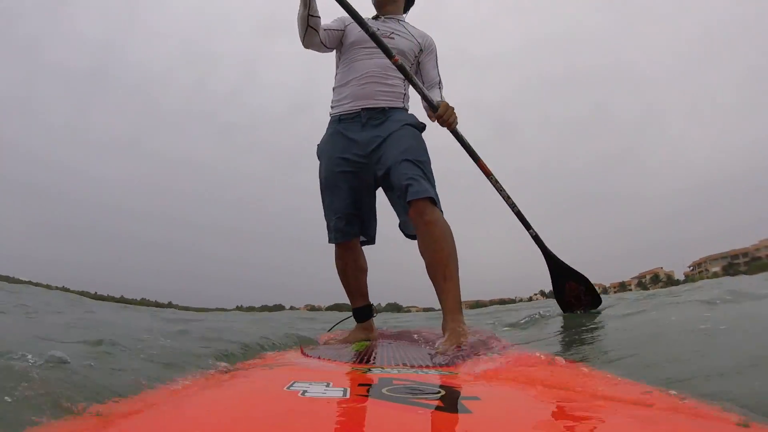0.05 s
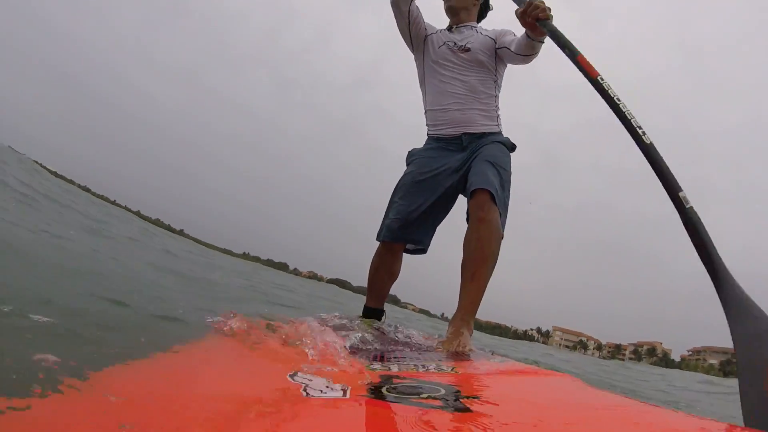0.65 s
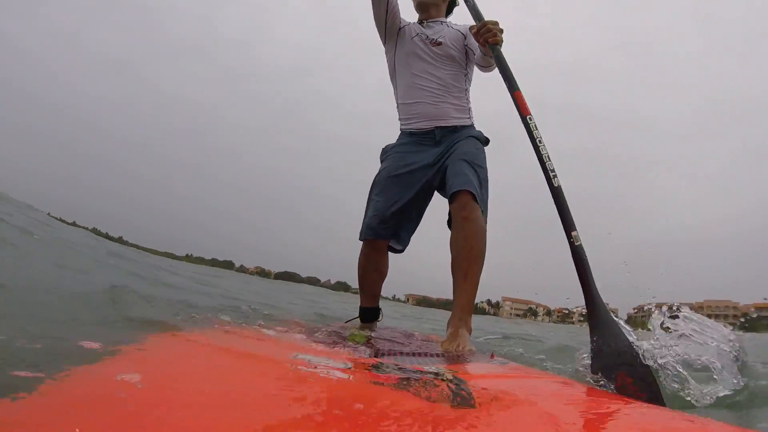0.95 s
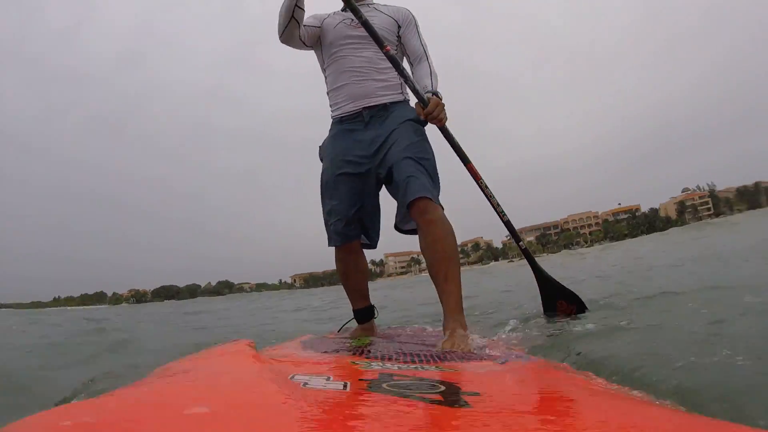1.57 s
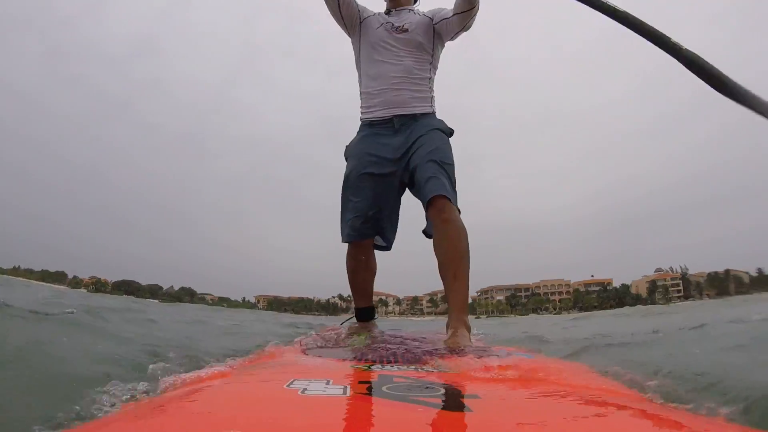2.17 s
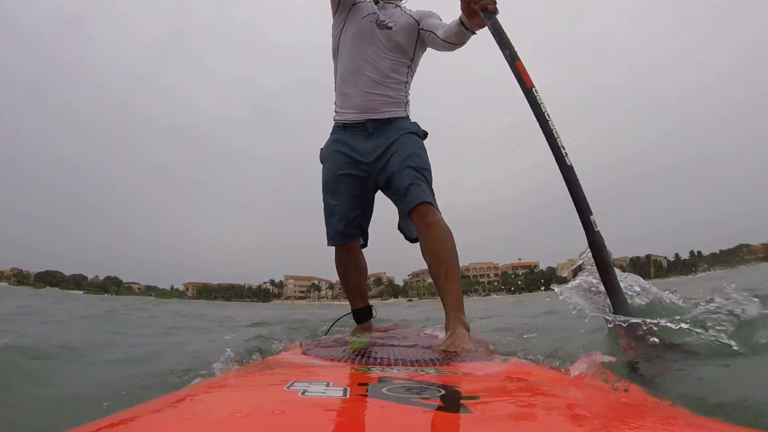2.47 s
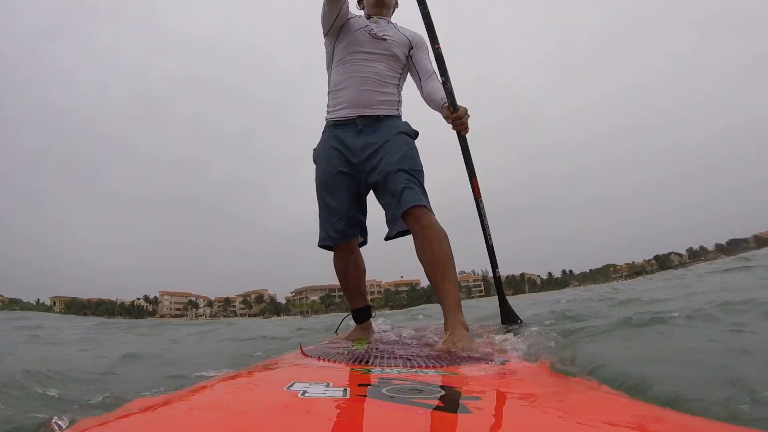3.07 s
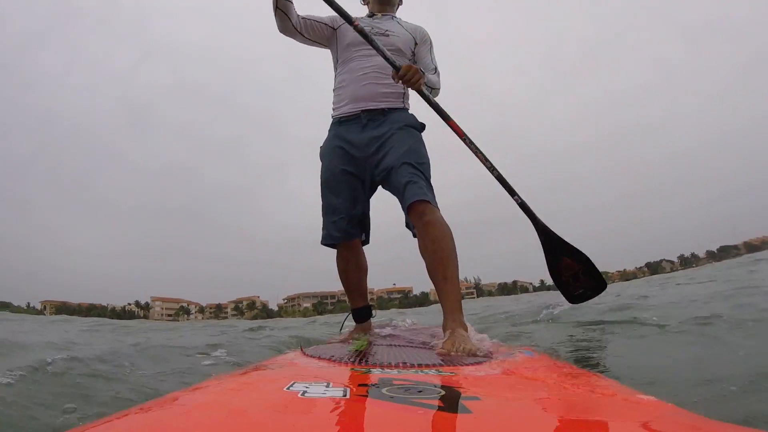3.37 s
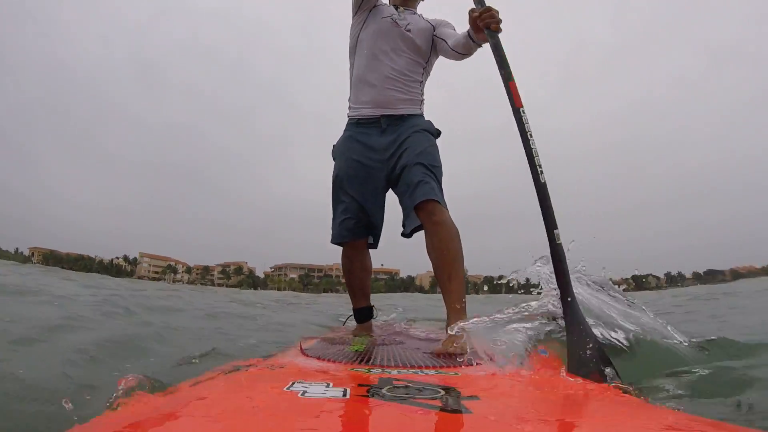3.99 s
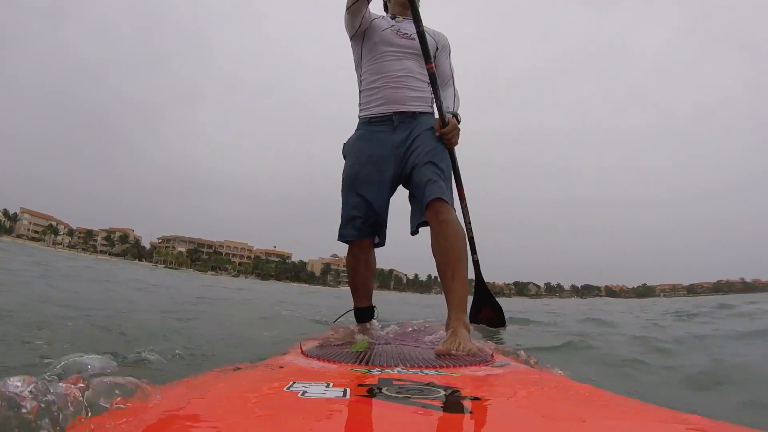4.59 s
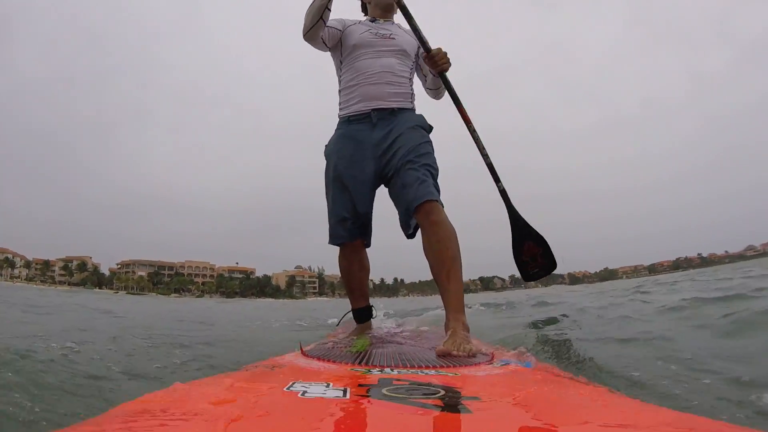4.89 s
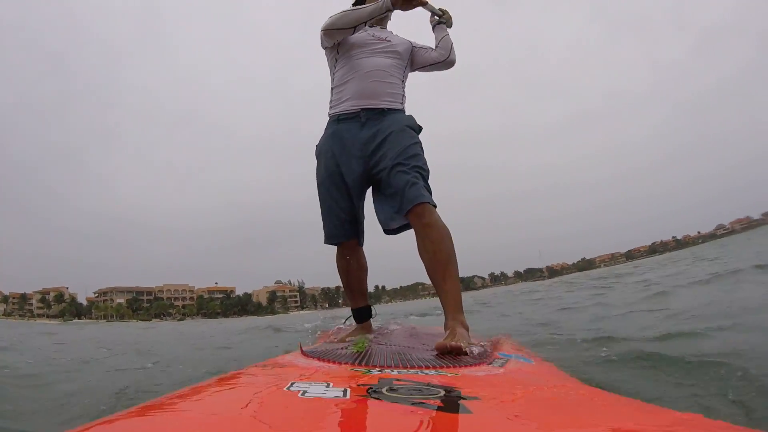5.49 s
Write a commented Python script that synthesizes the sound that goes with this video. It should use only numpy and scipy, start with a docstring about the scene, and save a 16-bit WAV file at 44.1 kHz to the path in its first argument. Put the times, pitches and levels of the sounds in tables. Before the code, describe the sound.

Choppy water gurgles and slaps against a hollow paddleboard while paddle strokes splash and wind rumbles on the microphone.

```python
"""A paddleboard crosses choppy sea, heard from a camera in a housing on its nose.
At first a film of water muffles the microphone; it drains off within a second. All along, waves gurgle
by the board's edges and throw spray on the housing, and wavelets slap the hollow hull, trapping air.
From about one second on, the paddle flings up four showers that rain back on the sea.
Near the end, the wind that has been rumbling on the microphone rises into thumping gusts."""
import sys
import numpy as np
from scipy import signal
from scipy.fft import rfft, irfft
from scipy.io import wavfile
from scipy.ndimage import map_coordinates

SR = 44100
rng = np.random.default_rng(int(sys.argv[2]) if len(sys.argv) > 2 else 0)


def generate_wav(sig):
    """Save sig (samples, or channels by samples) to the path in sys.argv[1] as 16-bit PCM at SR."""
    pcm = np.round(np.clip(np.atleast_2d(sig).T, -1, 1) * 32767).astype(np.int16)
    wavfile.write(sys.argv[1], SR, pcm)


N = 248724
TIME = np.arange(N) / SR

# A tone table says how strong a sound is from low to high. Columns: pitch_hz, level_db
WIND_TONE = [(15, -1), (30, -5), (58, -1.5), (95, -6.5), (170, -12.5), (320, -20.5), (520, -26), (900, -40)]  # wind on the microphone
DRUM_TONE = [(60, -21), (88, 5), (115, -4.5), (170, -7.5)]  # waves drumming on the board
GURGLE_TONE = [(160, -4), (210, -4), (280, 3), (420, -7.5), (560, -3.5), (700, -10)]  # large bubbles
BABBLE_TONE = [(700, 4.5), (1100, 4), (1500, -0.5), (2200, -3), (3200, -30.5)]  # small bubbles
FOAM_TONE = [(1900, 10.5), (3300, -2.5), (5200, -7.5)]  # tiny bubbles in foam
FIZZ_TONE = [(2500, 7.5), (5000, -0.5), (9400, -2.5)]  # bursting bubbles and fine droplets
GUSH_TONE = [(350, 0), (600, 5), (820, -4.5), (1100, -5), (1600, -8.5), (2400, -11.5), (3200, -27.5)]  # breaking crests
SPLASH_TONE = [(350, -5), (600, 5), (820, -4.5), (1100, -6.5), (1600, -8.5), (2400, -23.5), (4000, -29.5)]  # bubbles scattered by a slap
CHURN_TONE = [(270, 0), (450, 2), (700, -10), (1200, -18.5)]  # bubbles torn from an air pocket

# Breeze on the microphone: time_s, level_db
BREEZE = [(0, -29), (.6, -33), (1.35, -30.5), (1.47, -39), (2.47, -44), (2.95, -33), (3.2, -37.5),
          (4.68, -34.5), (4.75, -27), (5.0, -26), (5.25, -24.5), (5.64, -29.5)]
# Gusts on top of the breeze: middle_s, level_db, half_length_s
GUSTS = [(.39, -33, 0.0333), (4.24, -33.5, 0.05864), (5.075, -20, 0.04601), (5.28, -19.5, 0.05883),
         (5.47, -18.5, 0.05638), (5.64, -14, 0.0283)]
# Single swirls of air hitting the microphone: middle_s, level_db, pitch_hz
WIND_THUMPS = [(5.071, -9.5, 58.71), (5.245, -21, 61.68), (5.317, -10, 45), (5.386, -15, 55.6),
               (5.469, -13, 85.87), (5.628, -15, 73.8)]
# Water from the paddle coming down: full_at_s, rise_s, hold_s, level_db
STROKES = [(1.16, 0.1536, 0.0536, -38), (2.625, 0.0011, 0.1844, -43), (4.162, 0.0241, 0.04187, -37),
           (4.733, 0.2361, 0.127, -40.5)]
# Ripples between the waves: drum_db, gurgle_db, babble_db, spray_db
RIPPLES = (-48.5, -48, -54, -57)
# Waves running along the hull: full_at_s, hold_s, drum_db, gurgle_db, babble_db, spray_db
WAVES = [(0, 0.04776, -46, -35.5, -36.5, -71.5), (0.329, 0.0758, -51, -46.5, -44, -65),
         (0.566, 0.0455, -46.5, -31, -36, -54.5), (0.65, 0.10923, -34, -32, -39.5, -52.5),
         (0.849, 0.2696, -36.5, -54, -48, -53.5), (1.293, 0.09622, -33, -42.5, -44.5, -49.5),
         (1.464, 0.0592, -54.5, -38, -39, -46), (1.657, 0.15285, -39, -34.5, -37.5, -44.5),
         (1.946, 0.07841, -42.5, -33, -41, -43), (2.133, 0.0904, -55, -72, -46.5, -52.5),
         (2.428, 0.02643, -43.5, -34, -41, -51), (2.602, 0.17317, -55, -38, -44, -45.5),
         (2.809, 0.09508, -37.5, -39, -42, -48), (2.983, 0.06013, -34, -36, -45, -47.5),
         (3.168, 0.02344, -45, -38.5, -49, -75), (3.79, 0.03108, -37, -49, -52.5, -56.5),
         (4.037, 0.02653, -33, -30, -38.5, -47.5), (4.196, 0.10323, -33, -44, -41.5, -44),
         (4.42, 0.1748, -37.5, -31.5, -40.5, -44.5), (4.752, 0.24305, -34.5, -37, -42.5, -57),
         (5.038, 0.3065, -39, -36, -45.5, -49.5), (5.478, .22, -34, -37, -52, -53.5)]
# The ways the camera housing rings: pitch_hz, width_hz, level_db
HOUSING_RINGS = [(2987.4, 3912.5, -14), (5037.7, 650, -8), (6491.4, 267.43, 1), (7208.1, 754.9, -4.5),
                 (8411.3, 686.1, -3.5)]
# The heaviest drops landing on the housing: start_s, level_db
HEAVY_DROPS = [(.1445, -18.5), (.632, -26), (.6794, -27), (.7101, -32.5), (.7585, -29.5), (1.638, -21),
               (1.7153, -24), (1.7855, -19.5), (1.9478, -25.5), (1.9949, -21), (2.2148, -23.5),
               (2.4473, -25.5), (2.6115, -25), (2.7316, -19), (2.7738, -24), (2.8395, -23), (3.0677, -22.5),
               (3.1411, -32.5), (3.2, -34), (3.6282, -34.5), (3.755, -31.5), (3.802, -32.5), (4.049, -26),
               (4.1438, -23.5), (4.1645, -14.5), (4.43, -22), (4.457, -22.5), (4.6242, -37), (4.7267, -19),
               (4.8407, -18.5), (5.198, -26.5), (5.3395, -24.5), (5.5089, -28)]
# Short rushes of breaking water: middle_s, level_db, half_length_s
GUSHES = [(.142, -21, 0.00385), (.342, -34, 0.003883), (.385, -29.5, 0.01169), (.585, -32.5, 0.02865),
          (1.904, -30.5, 0.002028), (1.971, -34, 0.024), (2.011, -31.5, 0.010734), (2.448, -35.5, 0.01359),
          (2.978, -27, 0.006609), (3.079, -26.5, 0.008912), (3.126, -34, 0.007455),
          (3.187, -28.5, 0.007865), (3.222, -34, 0.00859), (3.766, -36, 0.004125), (3.93, -35, 0.012516),
          (4.038, -27.5, 0.003794), (4.092, -36.5, 0.00587), (4.414, -29, 0.005987), (4.485, -30, 0.00661),
          (4.53, -30, 0.00326), (4.554, -29, 0.01077), (4.587, -26.5, 0.01763), (4.637, -32.5, 0.0086),
          (4.73, -33, 0.002732), (4.849, -26.5, 0.006427), (5.06, -33, 0.01605), (5.312, -38.5, 0.00405),
          (5.341, -31.5, 0.005114), (5.436, -40.5, 0.004527), (5.512, -33, 0.001888)]
# The clearest single bubbles: start_s, level_db, pitch_hz
PLOPS = [(.009, -18, 997.7), (.042, -34, 1060), (0.229, -20.5, 257.2), (0.452, -20.5, 136.5),
         (.546, -23, 970.6), (.577, -17, 434.3), (.603, -17, 382.6), (.609, -26.5, 1009),
         (0.696, -20.5, 120.4), (.724, -20.5, 219.1), (.752, -19, 258.5), (1.181, -28, 3736),
         (1.317, -21.5, 1030), (1.319, -18.5, 1331), (1.322, -25, 1530), (1.674, -24, 1617),
         (1.678, -11.5, 529.8), (1.712, -28, 1700), (1.953, -18, 2129), (2.031, -20, 350),
         (2.546, -11.5, 592.3), (2.547, -18.5, 1224), (2.559, -23.5, 484.8), (2.594, -24, 337.4),
         (2.648, -24, 305.3), (2.664, -23, 301.5), (3.082, -18.5, 423), (3.183, -21, 940.8),
         (3.217, -19.5, 440.3), (3.207, -14, 1058), (3.344, -35, 2471), (3.499, -27.5, 537.7),
         (3.546, -25.5, 328.2), (3.762, -32, 1846), (3.864, -34.5, 1411), (3.918, -27, 980.2),
         (4.034, -26, 1949), (4.068, -27, 2245), (4.092, -29.5, 1262), (4.146, -29.5, 1228),
         (4.165, -25.5, 2133), (4.168, -29, 3220), (4.482, -16, 433.9), (4.577, -17.5, 678.2),
         (4.734, -23, 588.3), (4.823, -21.5, 596.1), (4.879, -16, 229.3), (5.305, -27, 1875),
         (5.337, -21.5, 473.5)]
# The ways the hollow board rings: pitch_hz, level_db, fade_s (time to fall 60 dB)
HULL_RINGS = [(91.46, 2.5, 0.23847), (160.86, 0.5, 0.058), (287.56, -7.5, 0.14), (562.54, -3.5, 0.06)]
# Wavelets slapping the hull: start_s, pocket_db, pocket_hz, swell_cycles, smack_hz, splash_db, board_db
SLAPS = [(0.1437, -9.5, 220, 0.2434, 1012, -25.5, -28), (0.5698, -8, 352.3, 1.0074, 952.3, -39, -53.5),
         (.640, -11, 194.5, 0.3283, 900, -47.5, -23.5), (.647, -8, 212.7, 0.5896, 700, -53.5, -48),
         (.852, -19.5, 225.3, 0.24, 1140, -34.5, -43), (.873, -12, 203.1, 0.7286, 930.8, -28, -43.5),
         (0.892, -16, 199.3, 0.4313, 1100, -46.5, -37), (1.901, -15, 430.6, 0.6743, 680, -43.5, -31.5),
         (1.9504, -8, 221.8, 0.3585, 547.9, -26, -20.5), (1.9934, -6.5, 198.4, 0.4858, 650, -24.5, -28.5),
         (2.544, -6.5, 267.7, 0.4154, 816.8, -25.5, -29), (2.966, -6, 236.3, 0.522, 609.2, -38, -16.5),
         (2.9789, -6, 424.2, 1.1263, 758.6, -24.5, -25.5), (3.034, -19.5, 259, 0.9174, 684, -57, -42),
         (3.068, -15, 237.8, 0.6734, 698.8, -34.5, -29.5), (3.138, -5, 181.9, 0.3887, 606.2, -39, -27.5),
         (3.205, -5.5, 231.2, 0.2903, 552.7, -25.5, -31.5), (3.772, -14, 196.2, 0.5836, 608.8, -38, -25),
         (3.984, -13, 242.5, 0.2687, 546.8, -30.5, -17), (4.052, -23, 327.4, 0.4, 613, -34, -24.5),
         (4.094, -27.5, 300, .4, 640, -46.5, -33), (4.376, -33, 139.8, 1.886, 604, -61.5, -22.5),
         (4.823, -17.5, 255.5, 0.6505, 600, -40.5, -28), (4.844, -16.5, 225.5, 0.867, 1109, -32, -26.5),
         (4.956, -14, 264.4, 0.36, 573.6, -32.5, -23), (4.885, -19.5, 221.1, 0.481, 555.3, -44.5, -31.5),
         (5.256, -17.5, 256.1, 0.508, 600.9, -45.5, -28), (5.458, -16, 237.5, 0.562, 603, -45, -32),
         (5.511, -13, 332.6, 0.2603, 605.2, -49.5, -24)]
# Water film over the microphone: time_s, treble_loss_db, hollowness (0 to 1)
FILM = [(0, 32, 0.82), (.33, 31, 0.96), (.40, 16.5, 0.99), (.51, 16.5, 0.82), (.54, 5, 0.66),
        (.75, 2.5, 0.92), (1.0, 2, 0)]
# The hollow sound of the wet housing: pitch_hz, width_hz, boost_db
FILM_BANDS = [(236.6, 130, 3), (638.13, 562.6, -17), (966.32, 161.6, 9.5), (1227.5, 280, -6.5),
              (2104.4, 820, 5)]

WAVE_RISE_S, WAVE_FALL_DB_PER_S = 0.1562, 131.5  # a rise is the time taken to gain 20 dB
SPRAY_FLIGHT_S, SPRAY_RISE_S, SPRAY_FALL_DB_PER_S = 0.0068, 0.14, 66.5
STROKE_FALL_DB_PER_S, TINKLE_DB, STROKE_BABBLE_DB = 77.5, -3.5, -4.5
POCKET_CYCLES, DAMPED_ABOVE_DB, DB_PER_HALVING = 3.4985, -10.5, 20
CHURN_DB, CHURN_DECAY_S = -20.5, 0.014273
SLAP_CUT_HZ, SPLASH_CUT_HZ, FILM_CUT_HZ = 3076.6, 2513.7, 2874.3
HISS_DB, ROLL_OFF_HZ, CUTOFF_HZ = -71.5, 10250, 13900


def from_db(db):
    """Turn decibels into a number to multiply by."""
    return 10 ** (np.asarray(db) / 20)


def rms_one(x):
    """Scale a sound to an average power of 1."""
    return x / np.sqrt(np.mean(x ** 2) + 1e-20)


def in_time(rows):
    """Join a table's points with lines: one curve for each column after the time."""
    times, *columns = np.transpose(rows)
    return [np.interp(TIME, times, column) for column in columns]


def butter(x, hz, kind, order=2):
    """Keep the "low" or the "high" side of hz."""
    return signal.sosfilt(signal.butter(order, hz, kind, fs=SR, output="sos"), x + 1e-18)


def resonate(x, hz, width_hz):
    """Let a sound ring at one pitch, weakening the others."""
    r = np.exp(-np.pi * width_hz / SR)
    feedback = [1, -2 * r * np.cos(2 * np.pi * hz / SR), r * r]
    return signal.lfilter(np.array([1, 0, -1]) * (1 - r * r) / 2, feedback, x + 1e-18)


def drift(per_s):
    """A random wobble that takes a new value per_s times a second."""
    return map_coordinates(rng.standard_normal(4096), [TIME * per_s], order=1, mode="wrap")


def add(track, start_s, sound):
    """Mix a sound into a track."""
    at = max(round(start_s * SR), 0)
    track[at:at + len(sound)] += sound[:N - at]


def swells(rows):
    """Level over time of short rushes that rise and fall smoothly."""
    return sum(from_db(db) * np.exp(-((TIME - s) / half_s) ** 2 / 2) for s, db, half_s in rows)


def surges(rows, rise_s, fall_db_per_s):
    """Power over time of water that rises, holds and drains away."""
    power = np.zeros(N)
    for full_at_s, hold_s, db in rows:
        rising_db = 20 * np.maximum(full_at_s - TIME, 0) / rise_s
        draining_db = fall_db_per_s * np.maximum(TIME - full_at_s - hold_s, 0)
        power += from_db(db - rising_db - draining_db) ** 2
    return power


def strays(per_s, db, spread_db):
    """Chance events as rows: start_s, level_db, size (0 to 1)."""
    late, strength, size = rng.random((64, 3)).T
    start_s = (np.arange(len(late)) + late) / per_s
    return np.transpose([start_s, db + spread_db * (2 * strength - 1), size])[start_s < TIME[-1]]


def clicks(per_s, spread_db):
    """Random clicks, many small and a few large."""
    chance = rng.random(N) * SR / per_s
    born = np.flatnonzero(chance < 1)
    out = np.zeros(N)
    out[born] = from_db(spread_db * np.minimum(-np.log(chance[born]), np.pi)) * (-1) ** born
    return out


def bubbling(tone, per_s, spread_db, sharpness, pitches):
    """A swarm of bubbles: each is a click that rings for a few cycles."""
    hz, db = np.transpose(tone)
    out = np.zeros(N)
    for pitch in np.geomspace(hz[0], hz[-1], pitches):
        width = pitch / max(sharpness, 1)
        births = clicks(per_s / pitches, spread_db)
        rings = resonate(resonate(births, pitch, width), pitch, width)
        out += rms_one(rings) * np.sqrt(pitch) * from_db(np.interp(np.log(pitch), np.log(hz), db))
    return rms_one(out)


def bubble(hz, cycles, rise, swell):
    """One pocket of air swells, fades and climbs in pitch as it nears the surface."""
    turns = TIME[:SR // 5] * hz
    life = turns / max(cycles, 1)
    ring = np.sin(2 * np.pi * turns * (1 + rise * life / 2))
    wave = ring * (1 - np.exp(-(turns / swell) ** 2)) * np.exp(-np.log(1000) * life)
    return wave / np.abs(wave).max()


def wind():
    """Swirling air rumbles unevenly on the microphone: a breeze with gusts on top."""
    hz, db = np.transpose(WIND_TONE)
    all_hz = np.maximum(np.arange(N // 2 + 1) * SR / N, 1)
    shape = from_db(np.interp(np.log(all_hz), np.log(hz), db)) / (1 + (all_hz / hz[-1]) ** 2)
    noise = irfft(rfft(rng.standard_normal(N)) * shape, N)
    rumble = rms_one(butter(noise, 18, "high"))
    breeze_db, = in_time(BREEZE)
    return rumble * np.hypot(from_db(breeze_db), swells(GUSTS)) * from_db(0.37 * drift(25) - 0.5)


def wind_thumps(half_length_cycles=0.5388):
    """A swirl of air hits the microphone with one low thump."""
    out = np.zeros(N)
    for middle_s, db, hz in WIND_THUMPS:
        turns = hz * (TIME - middle_s)
        out += from_db(db) * np.cos(2 * np.pi * turns) * np.exp(-(turns / half_length_cycles) ** 2)
    return out


def paddle():
    """Power over time of the water that the strokes fling up."""
    return sum(surges([(s, hold_s, db)], rise_s, STROKE_FALL_DB_PER_S)
               for s, rise_s, hold_s, db in STROKES)


def showers():
    """Water thrown up by the paddle rains back and tinkles on the sea."""
    tinkle = bubbling(FOAM_TONE, per_s=6500, spread_db=4.5, sharpness=3.2, pitches=18)
    return np.sqrt(paddle()) * from_db(TINKLE_DB) * tinkle


def housing(x):
    """The camera's case rings at several high pitches when water hits it."""
    return sum(from_db(db) * resonate(x, hz, width) * (-1) ** k
               for k, (hz, width, db) in enumerate(HOUSING_RINGS))


def spray():
    """Foam and fine droplets from waves and paddle fizz on and around the housing."""
    thrown = [(s + SPRAY_FLIGHT_S, hold_s, db) for s, hold_s, *_, db in WAVES]
    power = from_db(RIPPLES[-1]) ** 2 + surges(thrown, SPRAY_RISE_S, SPRAY_FALL_DB_PER_S) + paddle()
    fizz = bubbling(FIZZ_TONE, per_s=1600, spread_db=6.5, sharpness=7.516, pitches=22)
    mist = 1.1607 * rng.standard_normal(N)  # the finest droplets merge into a hiss
    foam = from_db(-5) * bubbling(FOAM_TONE, per_s=1100, spread_db=3, sharpness=6.9, pitches=14)
    flicker = from_db(0.2086 + 0.8 * drift(70))
    return (rms_one(housing(fizz + mist)) + foam) * np.sqrt(power) * flicker


def drops():
    """Drops tick and spatter on the housing; the light ones come by chance."""
    taps = np.zeros(N)
    t = TIME[:SR // 30]
    light = [(s, db) for s, db, _ in strays(per_s=9.4, db=-35.5, spread_db=5.5)]
    for start_s, db in list(HEAVY_DROPS) + light:
        spatter = 0.11848 * rng.standard_normal(len(t)) * np.exp(-t / 0.007416)
        add(taps, start_s, from_db(db + 18.5) * (signal.unit_impulse(len(t)) + spatter))
    return housing(taps)


def wave_levels():
    """How strongly ripples and waves drum, gurgle and babble over time; the paddle adds babble."""
    full_at_s, hold_s, *levels = np.transpose(WAVES)
    drum, gurgle, babble = (
        from_db(calm_db) ** 2 + surges(zip(full_at_s, hold_s, db), WAVE_RISE_S, WAVE_FALL_DB_PER_S)
        for db, calm_db in zip(levels[:-1], RIPPLES))
    return np.sqrt([drum, gurgle, babble + from_db(STROKE_BABBLE_DB) ** 2 * paddle()])


def waves(drum_level, gurgle_level, babble_level):
    """Waves drum on the hollow board and fold in air: big bubbles gurgle, small ones babble."""
    wobble = drift(35)
    drum = bubbling(DRUM_TONE, per_s=300, spread_db=3.5, sharpness=2.9855, pitches=6)
    gurgle = bubbling(GURGLE_TONE, per_s=1000, spread_db=2, sharpness=4.446, pitches=10)
    babble = bubbling(BABBLE_TONE, per_s=1800, spread_db=3, sharpness=7.556, pitches=22)
    return (drum * drum_level * from_db(3)
            + gurgle * gurgle_level * from_db(1 + 1.919 * wobble)
            + babble * babble_level * from_db(-1.7435 + 1.3 * wobble))


def gushes():
    """Small crests break over the board's edges in a rush of bubbles."""
    return swells(GUSHES) * bubbling(GUSH_TONE, per_s=3200, spread_db=0.5, sharpness=2.74, pitches=14)


def plops(babble_level, low_hz=1193.3, high_hz=2804.6):
    """Lone bubbles ring with a clear pitch; faint stray ones grow with the babble around them."""
    clear, faint = np.zeros((2, N))
    stray = [(s, db, high_hz * (low_hz / high_hz) ** size)
             for s, db, size in strays(per_s=8, db=9, spread_db=-1)]
    for track, rows in ((clear, PLOPS), (faint, stray)):
        for start_s, db, hz in rows:
            plop = bubble(hz, cycles=6 + hz * 0.016613, rise=0.024, swell=0.4493)
            add(track, start_s, from_db(db) * plop)
    return clear + babble_level * faint


def slaps():
    """A wavelet smacks the hull and traps air, which throbs and breaks up while the board rings."""
    pockets, board, scatter, churn = np.zeros((4, N))
    t = TIME[:SR // 4]
    knock = sum(from_db(db) * np.sin(2 * np.pi * hz * t) * np.exp(-np.log(1000) * t / fade_s)
                for hz, db, fade_s in HULL_RINGS)
    burst = (1 - np.exp(-t / 0.00052)) * (np.exp(-t / 0.005451) + 0.16 * np.exp(-t / 0.019))
    for start_s, pocket_db, hz, swell, smack_hz, splash_db, board_db in SLAPS:
        smack = bubble(smack_hz, cycles=16, rise=0.11, swell=0.08)
        add(pockets, start_s, from_db(splash_db + 6.5) * smack)
        # air shut in gently rings longer; a hard slap collapses it sooner
        cycles = POCKET_CYCLES * (1 + 1.08 * swell) * 2 ** ((DAMPED_ABOVE_DB - pocket_db) / DB_PER_HALVING)
        add(pockets, start_s, from_db(pocket_db - 1) * bubble(hz, cycles, rise=0.64974, swell=swell))
        for k, (late, small) in enumerate(rng.random((3, 2))):  # each piece is later, higher, weaker
            piece = bubble(hz * (1 + 0.41 * (k + small)), cycles=16, rise=0.13, swell=0.33)
            delay_s = 0.0044304 * (k + late + 0.5)
            add(pockets, start_s + delay_s, from_db(pocket_db - 15.9 - 2.9 * k) * piece)
        # a slow swell pushes the board softly and wakes only its low notes
        add(board, start_s, from_db(board_db) * butter(knock, 1.6 * hz / swell, "low"))
        add(scatter, start_s, from_db(splash_db + 5.5) * burst)
        settling = (1 - np.exp(-t * hz)) * np.exp(-t / CHURN_DECAY_S)
        add(churn, start_s, from_db(pocket_db + CHURN_DB) * settling)
    pockets += churn * bubbling(CHURN_TONE, per_s=2500, spread_db=1.0623, sharpness=4.775, pitches=9)
    splash = scatter * bubbling(SPLASH_TONE, per_s=7600, spread_db=10.5, sharpness=4.17, pitches=12)
    body = butter(pockets, SLAP_CUT_HZ, "low", order=4) + board  # water softens the smack
    return butter(body, 51, "high") + butter(splash, SPLASH_CUT_HZ, "low", order=4)


def water_film(x):
    """Water over the microphone sounds hollow and holds back the treble until it drains off."""
    loss_db, hollowness = in_time(FILM)
    for hz, width, db in FILM_BANDS:
        x = x + hollowness * (from_db(db) - 1) * resonate(x, hz, width)
    clear = from_db(-loss_db)
    return clear * x + (1 - clear) * butter(x, FILM_CUT_HZ, "low", order=5)


def scene():
    """Everything reaches one microphone over open water, with no echo."""
    drum_level, gurgle_level, babble_level = wave_levels()
    background = wind() + wind_thumps() + waves(drum_level, gurgle_level, babble_level)
    splashes = slaps() + gushes() + plops(babble_level) + showers() + spray() + drops()
    return water_film(background + splashes)[None]


def record(dry):
    """The microphone adds a faint hiss; the treble falls away sharply and the very top is cut."""
    hissy = dry + from_db(HISS_DB) * rng.standard_normal(N)
    dull = signal.sosfilt(signal.cheby2(8, 39, ROLL_OFF_HZ, fs=SR, output="sos"), hissy)
    return signal.sosfilt(signal.ellip(8, .2, 62, CUTOFF_HZ, fs=SR, output="sos"), dull)


dry = scene()
out = record(dry)
generate_wav(out)
```